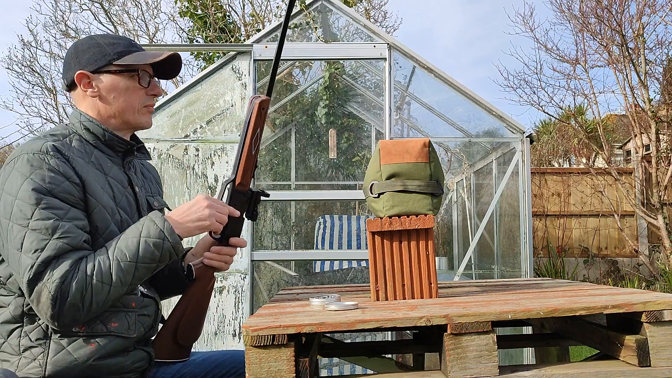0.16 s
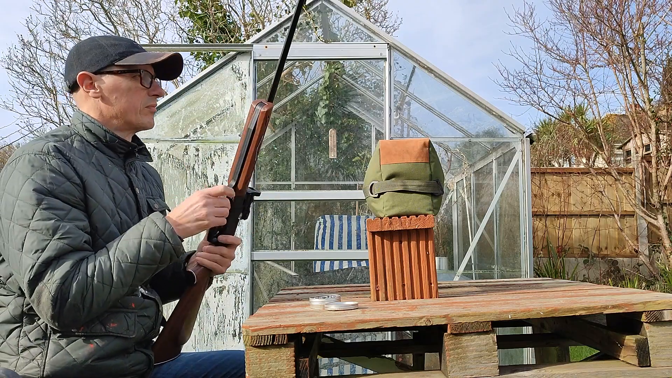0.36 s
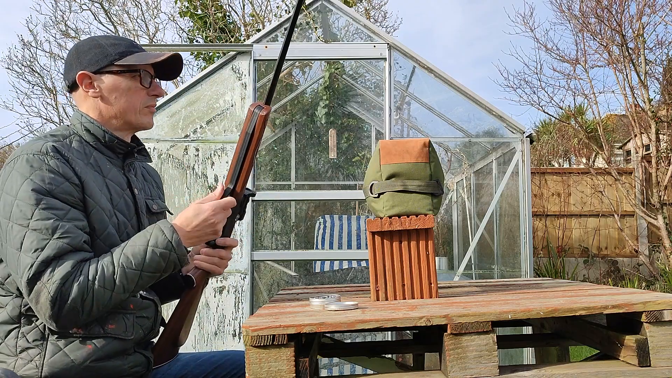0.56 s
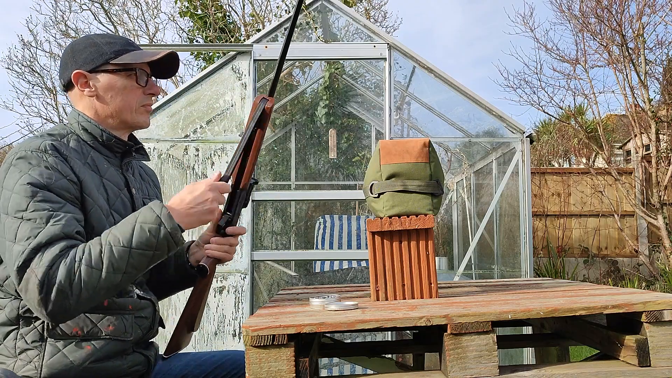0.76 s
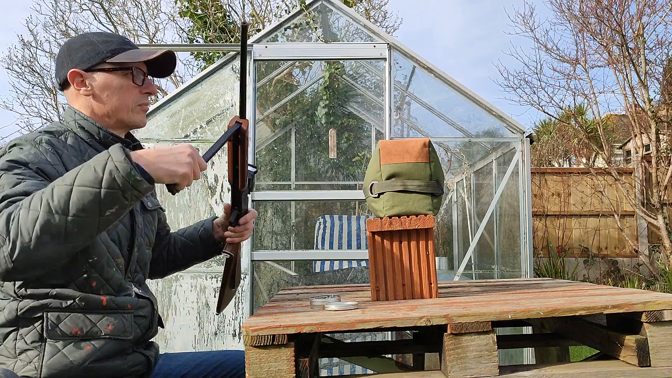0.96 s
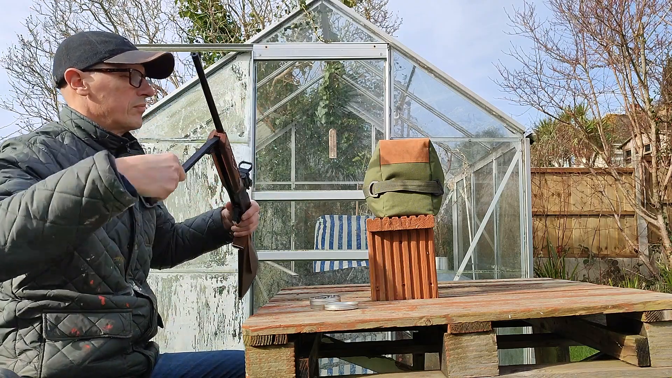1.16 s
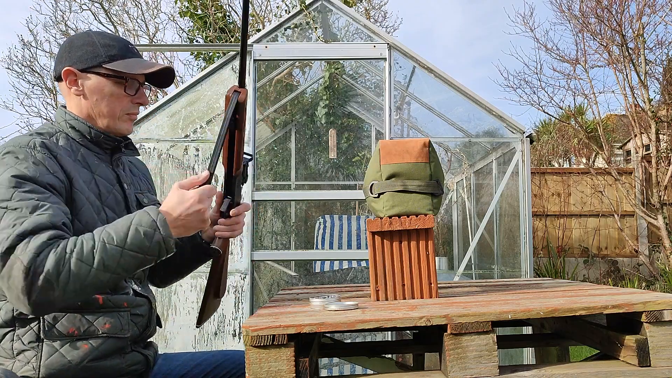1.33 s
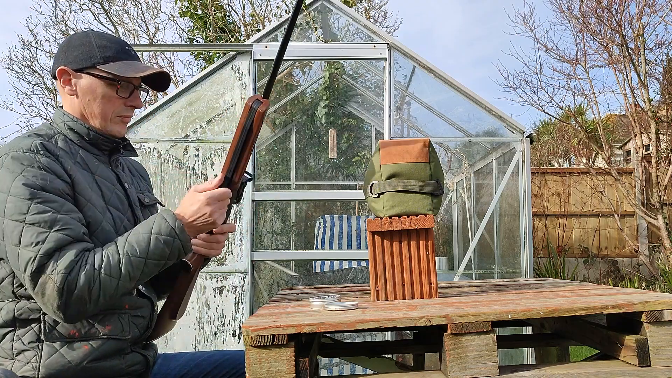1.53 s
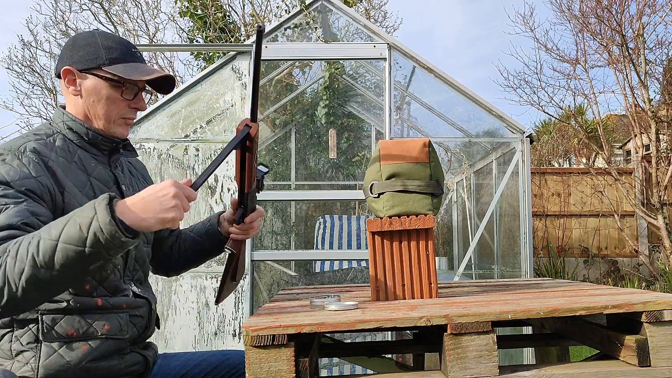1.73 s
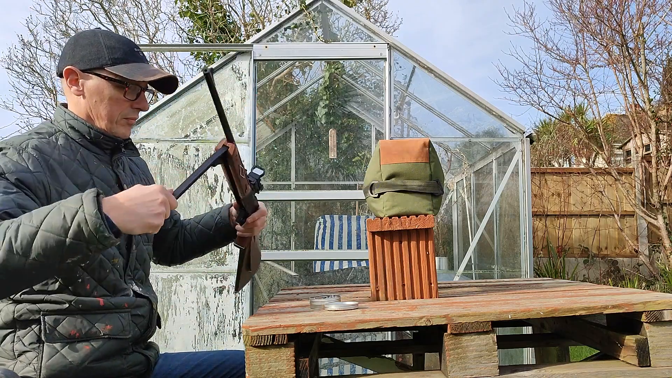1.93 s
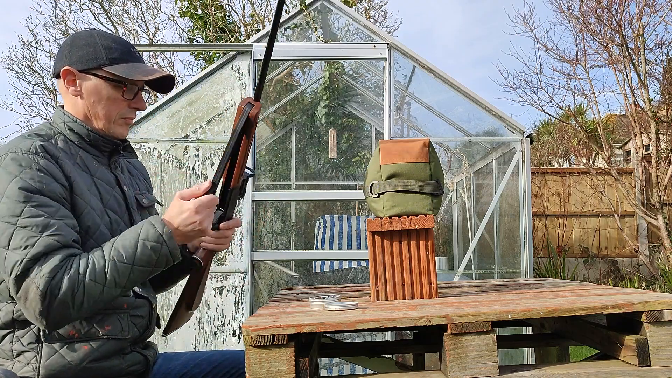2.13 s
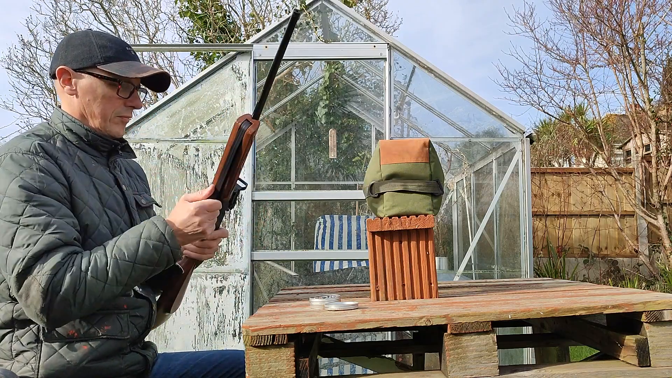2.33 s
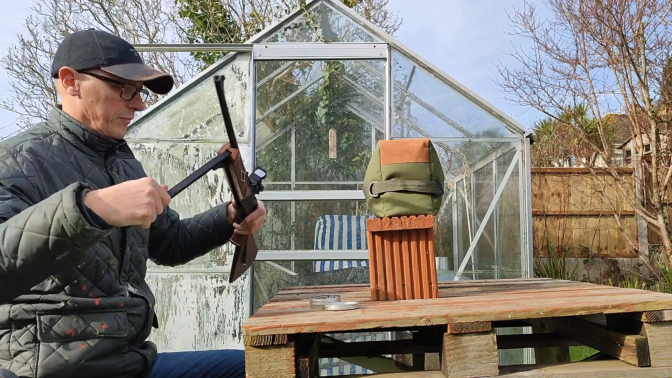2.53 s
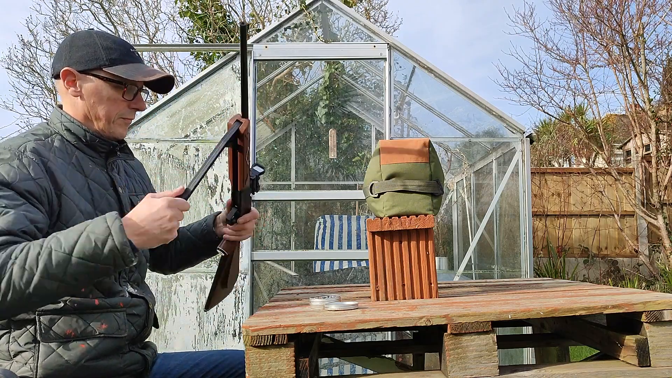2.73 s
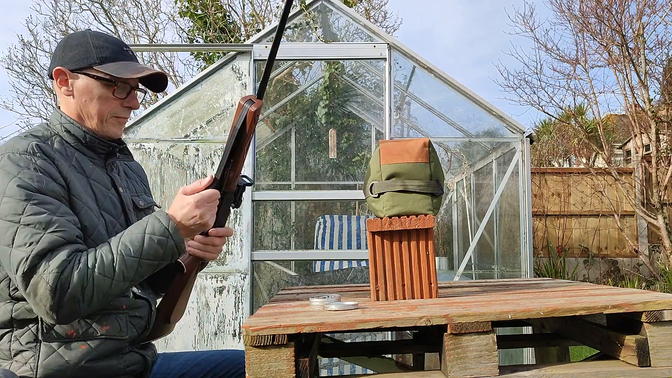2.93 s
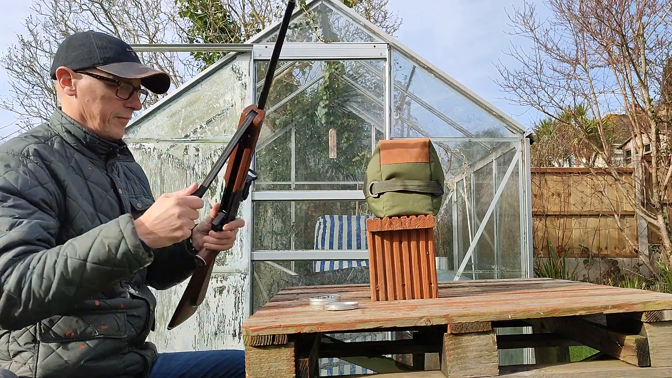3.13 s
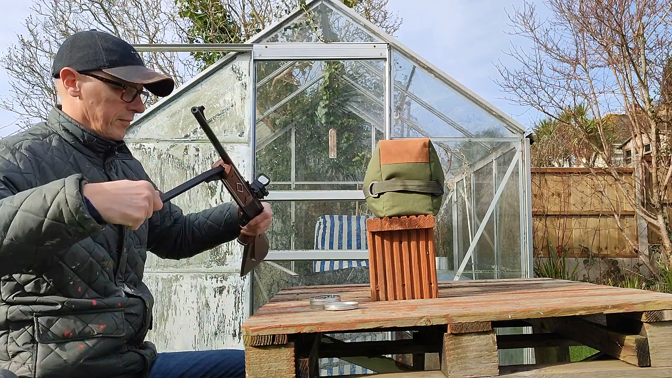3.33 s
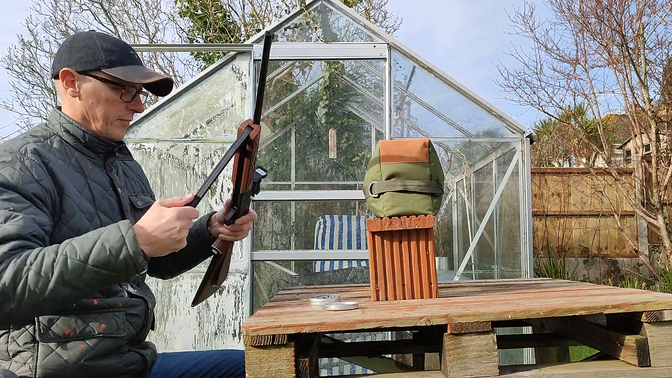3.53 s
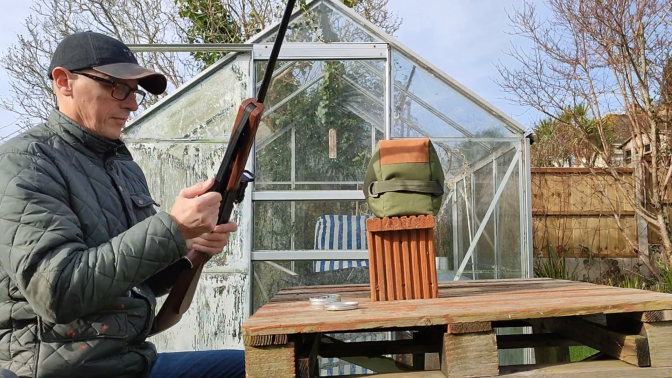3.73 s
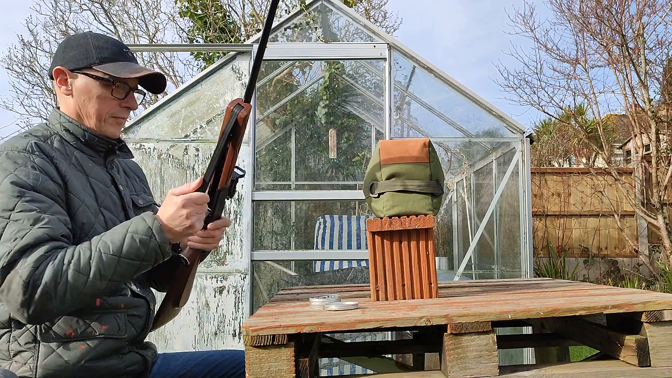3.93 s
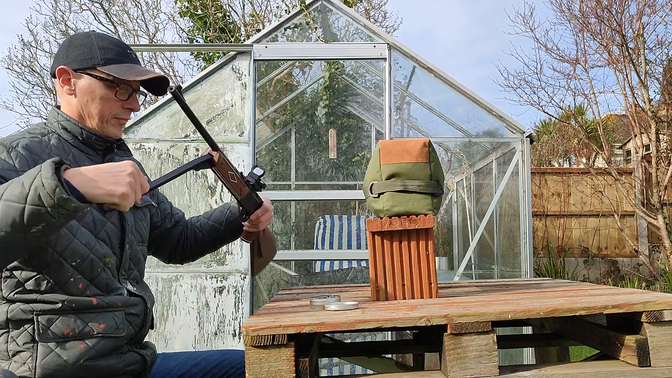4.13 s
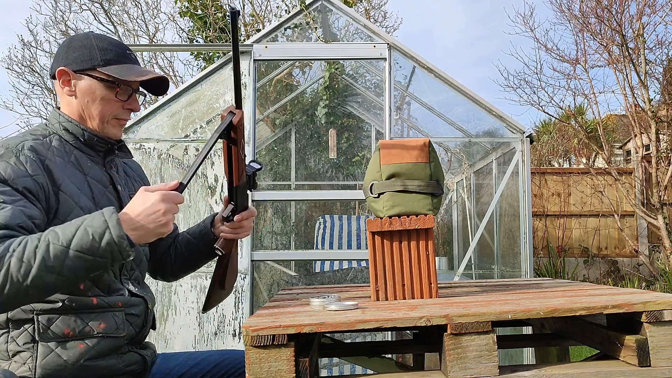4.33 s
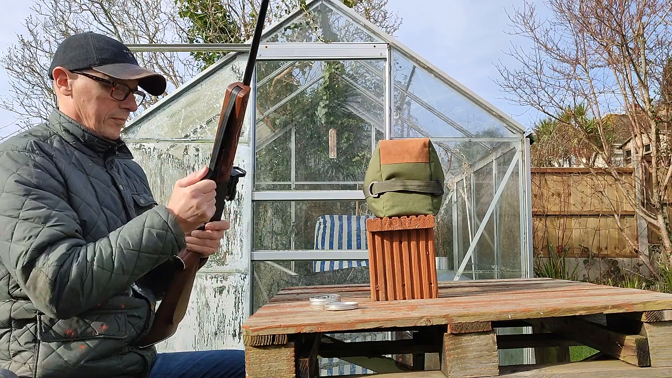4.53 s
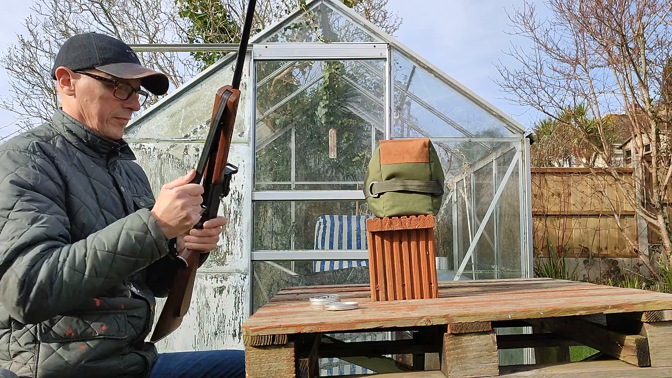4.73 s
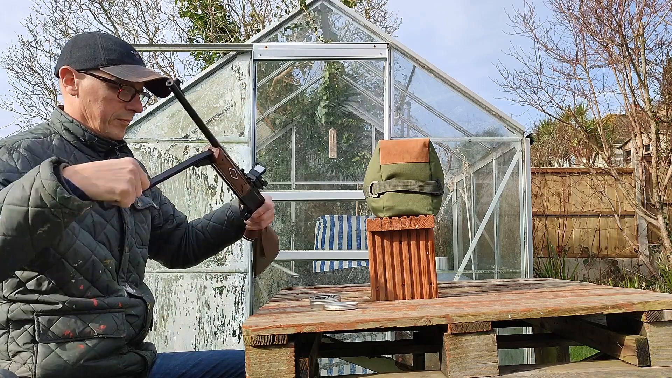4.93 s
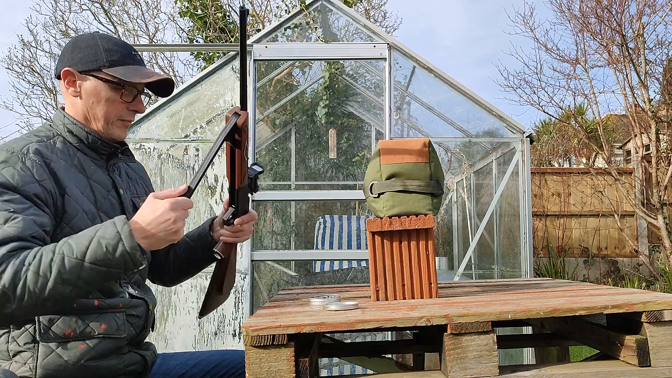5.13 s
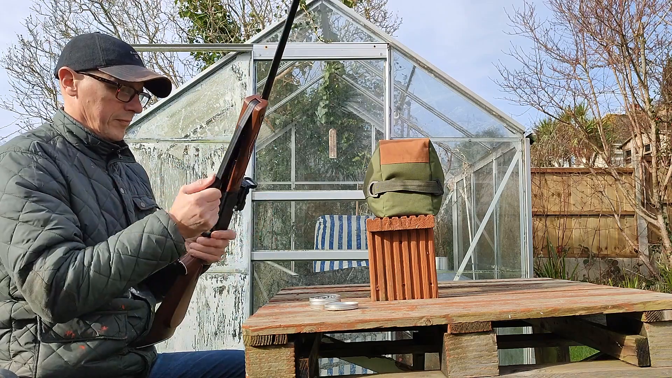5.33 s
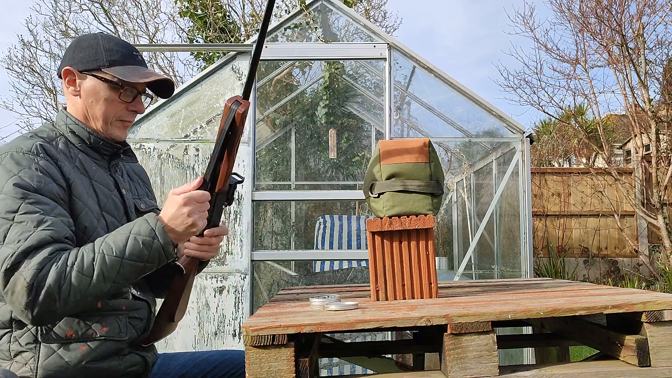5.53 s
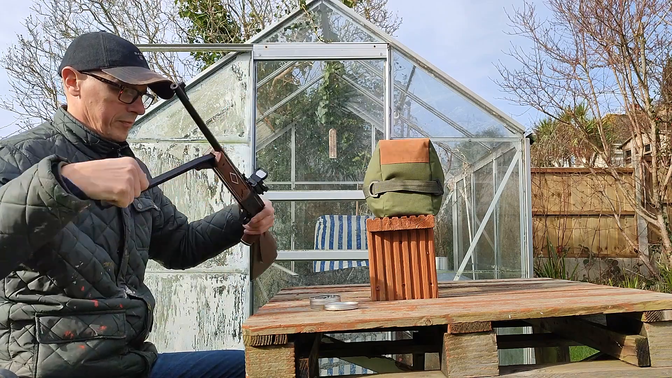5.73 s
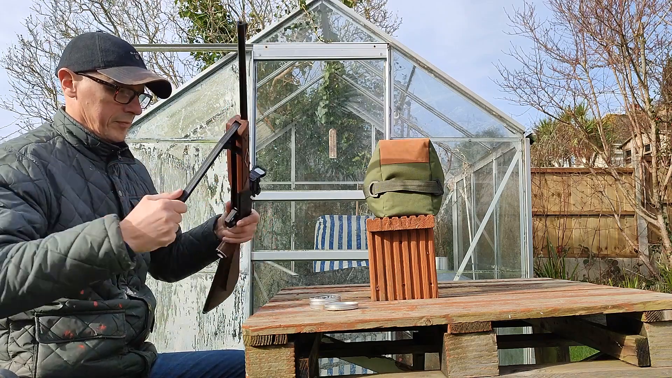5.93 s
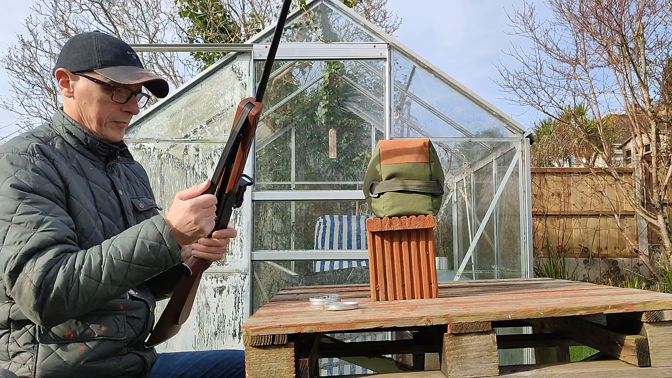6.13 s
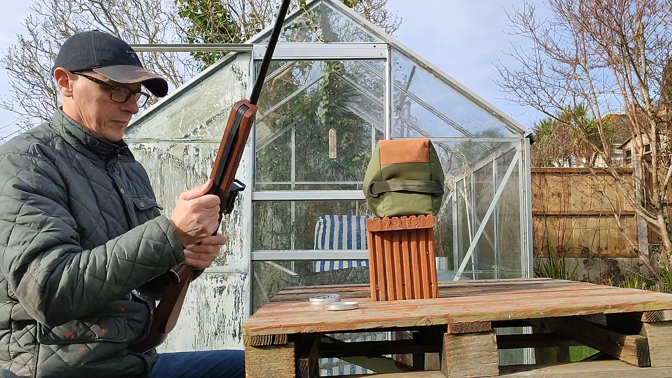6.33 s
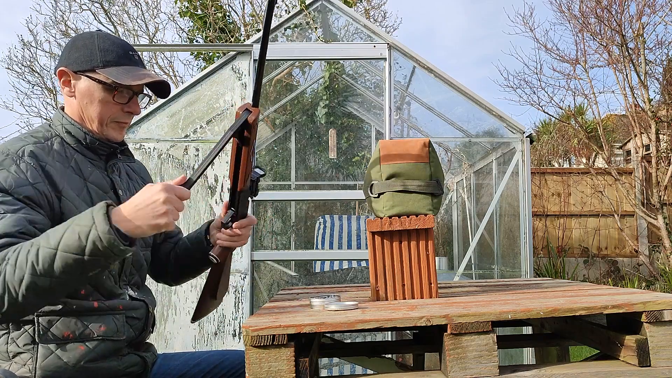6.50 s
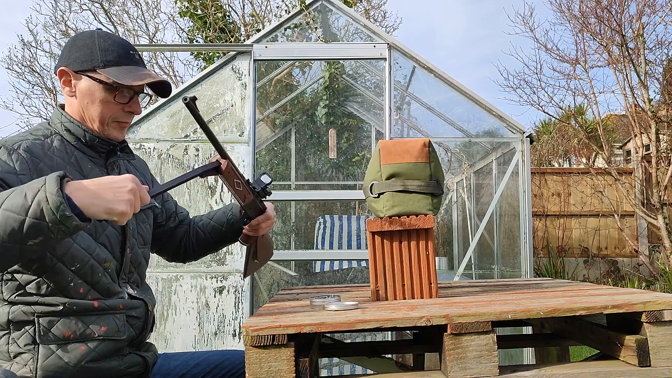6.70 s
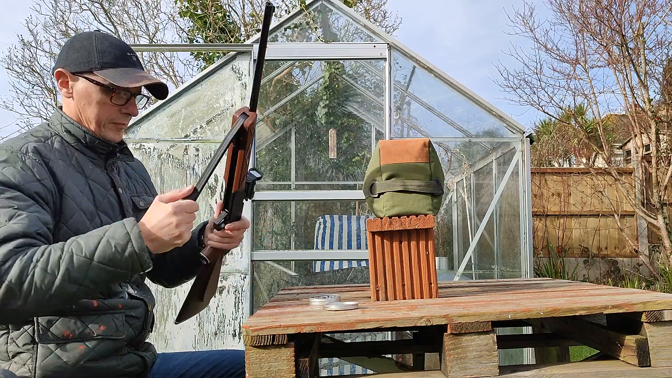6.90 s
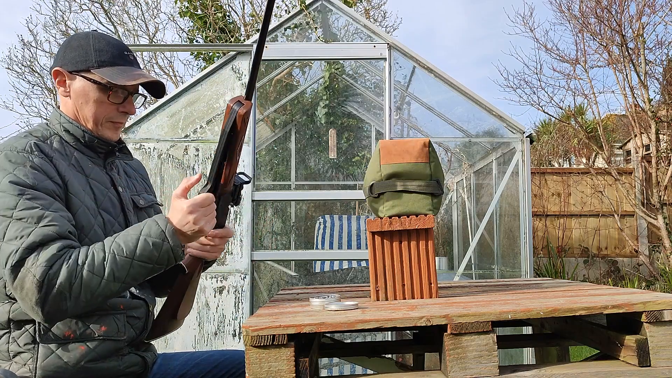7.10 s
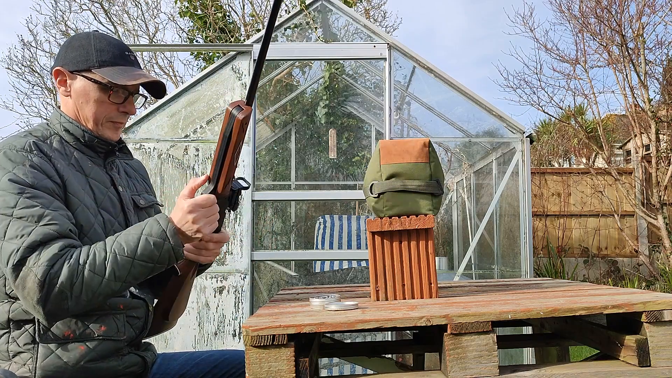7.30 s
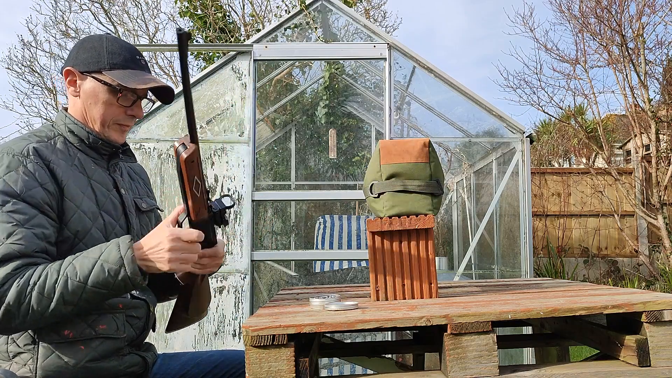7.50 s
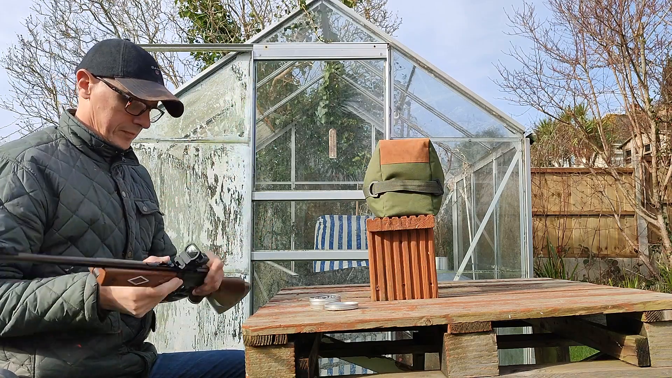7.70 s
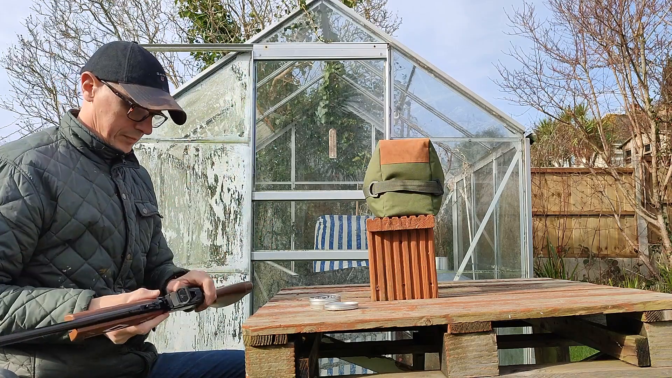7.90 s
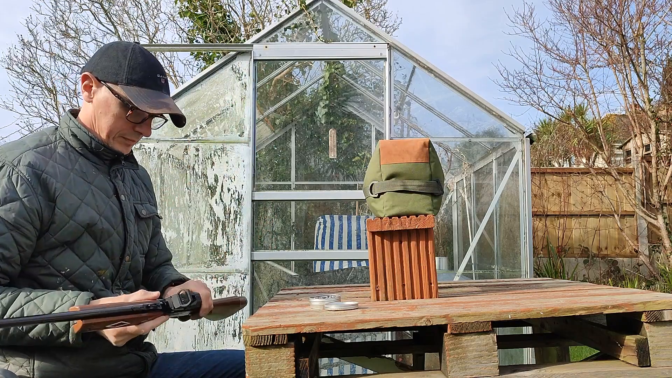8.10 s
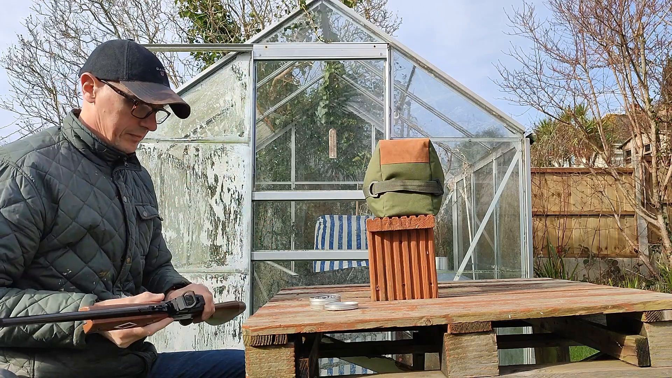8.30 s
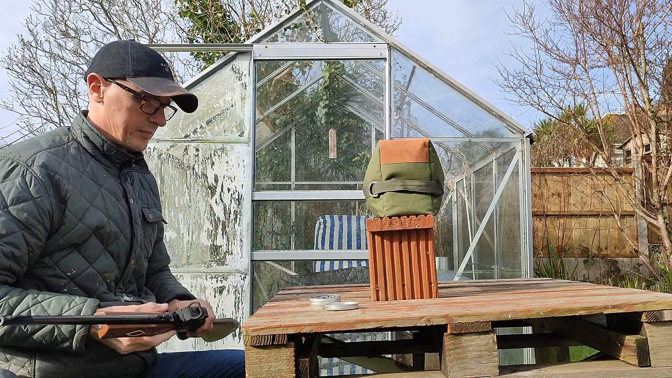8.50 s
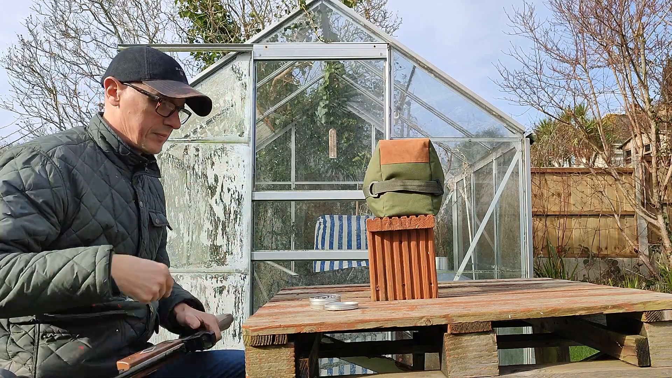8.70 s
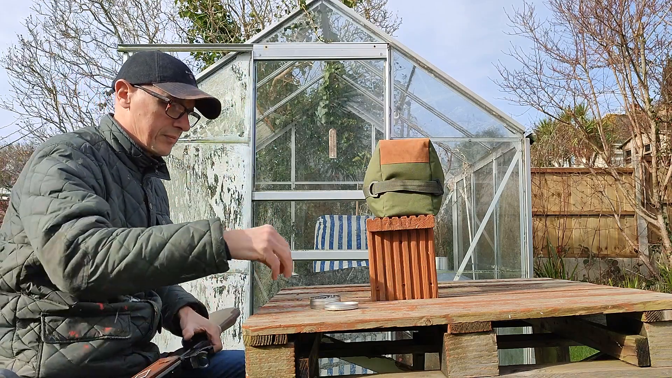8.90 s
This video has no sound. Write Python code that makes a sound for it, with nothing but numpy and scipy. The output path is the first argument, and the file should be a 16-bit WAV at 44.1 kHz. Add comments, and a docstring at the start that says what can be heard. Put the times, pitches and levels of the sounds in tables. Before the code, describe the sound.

An air rifle's pump arm is worked over and over with sharp clacks and lighter clicks, outdoors over faint distant traffic.

```python
"""In a garden, a few metres from a phone, someone works the pump arm of an air rifle.
Each time the arm, links and stops touch, they chatter briefly and make the rifle ring.
The piston seal rubs in its tube and a jacket rustles. A table, a glasshouse and a fence
throw echoes. Behind it all, distant traffic rumbles and a faint hum fades away."""
import sys
import numpy as np
from scipy import signal
from scipy.fft import rfft, irfft, next_fast_len
from scipy.io import wavfile
from scipy.ndimage import uniform_filter1d

SR = 44100
rng = np.random.default_rng(int(sys.argv[2]) if len(sys.argv) > 2 else 0)


def unload_audio(sound):
    """Save the sound as a 16-bit wav file, at the path given as the first command line argument."""
    columns = np.transpose(np.atleast_2d(sound))
    # keep every value between -1 and 1, then stretch to whole-number steps
    steps = np.round(np.clip(columns, -1, 1) * 32767)
    wavfile.write(sys.argv[1], SR, steps.astype(np.int16))


N = 394694
FREQ = np.arange(next_fast_len(N + SR) // 2 + 1) * SR / next_fast_len(N + SR)
FFT_SIZE = 2 * len(FREQ) - 2

# Six kinds of contact. Each row: time in seconds, level in dB, brightness in dB, extra wood sound in dB,
# chatter fade in ms. Levels in the tables are relative; a fade is the time to drop by 60 dB.
SLAMS = [(0.0, -32.5, -0.5, -22, 130), (0.017, -29.5, -4.5, -20, 53), (1.465, -18, -3, 1.5, 12.5),
         (1.472, -16.5, 0, 0, 34), (2.248, -24, 1, 8.5, 33), (2.259, -16, 1, 0, 24.5),
         (2.989, -23, 1, -2, 48), (3.003, -21.5, -1.5, 2, 26), (3.803, -16.5, -3.5, 4.5, 14),
         (3.813, -13.5, 1, -8, 24.4), (4.586, -11, 0, 0, 29), (5.406, -24, -5, -0.5, 21),
         (5.412, -11.5, 3, -4.5, 30), (6.276, -18.5, -2, 3, 37.4), (7.164, -27.5, -4, 1, 61),
         (7.166, -27, 8, 8, 25)]  # the arm slams shut on the tube, often in two blows
RELEASES = [(0.725, -31, 0, -12, 28), (0.736, -34, -3, -3, 33), (1.611, -31.5, 1.5, 2, 45),
            (1.621, -34, -2, 7, 38), (2.368, -30.5, 0.5, 1, 48), (3.16, -34.5, -1.5, -5, 36),
            (3.929, -31.5, 1, -3, 39.3), (4.727, -32, 0.5, -5, 43), (5.541, -30.5, -0.5, -2, 37.8),
            (6.421, -33.5, -2, -3, 48)]  # the arm leaves its catch with a hollow tock
LINKS = [(1.675, -37.5, -4, 6, 51), (4.006, -41.5, 9, -8, 30), (4.011, -30.5, -2, -8, 24),
         (4.806, -46, 10, -8, 52), (4.813, -36, -4.5, 0, 51), (5.62, -37.5, 2, 3, 33),
         (5.633, -42.5, -4, 0, 44), (6.508, -38.5, 5, -8, 21.75), (6.513, -40.5, -5.5, 4, 36)]  # the links take up their slack
SCRAPES = [(0.77, -36.5, -1.5, -1, 40), (0.784, -36, -2.5, 3, 40.4), (1.066, -38.5, 1, -3, 40.2),
           (1.681, -41, -5.5, 6, 40), (1.847, -38, 0.5, -3, 40), (2.398, -41, -6.5, -8, 40),
           (2.438, -34.5, -0.5, 1, 40), (2.597, -39, 0.5, -6, 40.2), (2.642, -47.5, -3, -4, 40),
           (3.311, -37, 1.5, 2, 40), (4.159, -36, -0.5, 5.5, 40), (4.96, -41, 1, 7, 41.3),
           (5.763, -39, 1, 1, 40.1), (6.658, -39, 0.5, 1, 40.3)]  # parts scrape into their stops
TICKS = [(1.229, -50.5, 1, 0, 23), (1.874, -61.5, 9, -4, 38), (1.903, -53.5, -7, 6, 30),
         (1.958, -51.5, 3.5, -4, 30), (2.126, -46, 0, -2, 40), (3.346, -57, 7, -2, 21.6),
         (3.361, -58, 5, 2, 35), (4.218, -51, -7.5, -2, 42), (4.994, -56.5, 2.5, 3, 49),
         (5.016, -48, -3.5, 0, 34), (5.822, -48, -7.5, -1, 42), (7.749, -42.5, -4.5, 8, 28),
         (8.346, -57, -5, -4, 35), (8.581, -55, -8, 6, 33)]  # loose pins tick
TAPS = [(4.787, -54, -1.5, -10, 30), (5.601, -57, 0, -8, 22), (7.394, -55.5, -4, -4.5, 43.8),
        (7.618, -49, 4.5, -2, 44.2), (7.878, -63.5, -2.5, 11, 52.3)]  # dull taps, most as the rifle is laid across the knees
# How each kind sounds. Each lists: levels in dB of stock, tube, arm, steel, edges and hollow note,
# then the note's pitch in Hz, its fade in seconds, chatter rise in ms, strike level in dB.
SLAM_TONE = (-25, -15, -16, -13, -27, -20, 1502, .035, .5, -2)
RELEASE_TONE = (-33, -13, -23, -18, -25, -10, 1310, .025, .5, -3)
LINK_TONE = (-26, -13, -14, -14, -23, -20, 1459, .035, 0.7, -6.5)
SCRAPE_TONE = (-24, -13, -17, -15.5, -21, -20.5, 1500, .035, 3, -28)
TICK_TONE = (-21, -18, -15, -12, -20, -16, 1350, .035, 0.6, 2)
TAP_TONE = (-10.5, -9.5, -15, -22, -31, 1, 890, .07, 1.3, 0)


def rifle(lowest_hz=282.6):
    """All the contacts, heard from the front and the side. The rifle is too small to give off deep bass."""
    knocks = (contacts(SLAMS, SLAM_TONE) + contacts(RELEASES, RELEASE_TONE) + contacts(LINKS, LINK_TONE)
              + contacts(SCRAPES, SCRAPE_TONE) + contacts(TICKS, TICK_TONE) + contacts(TAPS, TAP_TONE))
    return signal.sosfilt(signal.butter(4, lowest_hz, "high", fs=SR, output="sos"), knocks)


# The notes each part rings with. Each row: pitch in Hz, level in dB, fade in seconds.
STOCK_NOTES = [(357, -5.5, .03), (468, -2, 0.023), (647, -2.5, .02), (821, -5.5, 0.036)]
TUBE_NOTES = [(985, -8.5, .012), (1262, -8, 0.012), (1432, 1.5, 0.014), (1736, -3, 0.017),
              (2110, -5, 0.014)]
ARM_NOTES = [(2520, -1.4, .008), (2883, -0.49, 0.0089), (3420, 0, 0.0069), (3890, -1.5, 0.009),
             (4490, -2.3, 0.005)]
STEEL_NOTES = [(5200, 2, 0.00191), (6590, -2.5, 0.0039), (7476, -1, .003), (8800, -4, 0.00078)]
EDGE_NOTES = [(10400, -0.4, 0.00074), (12640, -0.66, 0.0012), (14300, -0.91, 0.00088)]
# How strongly stock, tube, arm, steel, edges and hollow note give off sound, in dB.
PART_DB = [6, 3.5, 8.22, 5.44, 6.63, 1.5]
BRIGHTNESS_SHARE = np.array([0, -1, 0, 1, 1.5, -1])  # dB each part gains per dB of brightness


def contacts(events, tone, grit_db=3.0):
    """Surfaces grind, strike, then chatter to rest, ringing each part. Gives front and side sound."""
    *tone_db, note_hz, note_fade, rise_ms, strike_db = tone
    hollow_note = [(note_hz, 0, note_fade)]
    parts = STOCK_NOTES, TUBE_NOTES, ARM_NOTES, STEEL_NOTES, EDGE_NOTES, hollow_note
    out = np.zeros((2, N + SR))
    lead = SR // 10  # room for grinding before the first strike
    ms = np.arange(SR // 14) / SR * 1000 - 5 * rise_ms
    strike = undb(strike_db) * np.exp(-np.abs(ms) / .35)
    for time, level_db, bright_db, wood_db, fade_ms in events:
        chatter = np.where(ms < 0, np.exp(ms / rise_ms), undb(-60 * ms / fade_ms))
        force = (chatter + strike) * undb(grit_db * rng.standard_normal(len(ms)))
        gains = undb(level_db + np.add(tone_db, PART_DB) + bright_db * BRIGHTNESS_SHARE)
        gains[0] *= undb(wood_db)
        start = lead + int((time + ms[0] / 1000) * SR)
        for direction in out:
            hit = sum(gain * ring(notes, force) for gain, notes in zip(gains, parts))
            direction[start:start + len(hit)] += hit
    return out[:, lead:lead + N]


def ring(notes, force):
    """Each note of a part is shaken by its own tiny slips and takes a share of the blow's energy."""
    t = np.arange(SR // 16) / SR
    hz, db, fade = np.transpose(notes)[:, :, None]
    slips = force * rng.standard_normal((len(notes), len(force)))
    fading_tones = undb(-60 * t / fade) * np.sin(2 * np.pi * hz * t)
    swing = signal.fftconvolve(slips, fading_tones, axes=1)
    swing *= np.sqrt(np.sum(force ** 2) / np.sum(swing ** 2, axis=1, keepdims=True))
    strength = undb(db) * np.sqrt(fade)
    share = strength / np.linalg.norm(strength)
    return np.sum(share * swing, axis=0)


def uneven_spread(side):
    """Sound waves shorter than the rifle spread unevenly, so left and right differ in the treble."""
    treble = shape(side, 1j * FREQ / (1j * FREQ + 2000))
    return undb(-3.5) * treble * np.array([[1], [.25]])


# Strokes of the seal, one each way. Each row: start in seconds, level in dB.
SEAL_STROKES = [(0.837, -67), (1.25, -60.5), (1.682, -57), (1.996, -61), (2.437, -57.5), (2.71, -62.5),
                (3.17, -59.5), (3.497, -65), (4.017, -60.5), (4.32, -61.5), (4.81, -60), (5.085, -65),
                (5.635, -61), (5.921, -61.5), (6.502, -61), (6.833, -63.5)]
# The colour of its rubbing. Each row: pitch in Hz, rough width in Hz, level in dB.
SEAL_BANDS = [(980, 150, -7), (1430, 200, 0), (1750, 260, -3), (2300, 700, -10)]


def seal(t, stroke_s=0.11):
    """The piston seal swishes as it rubs along the tube."""
    strokes = [(start, stroke_s, db) for start, db in SEAL_STROKES]
    return swells(t, strokes) * friction(SEAL_BANDS, rate_hz=60, flicker_db=1.5)


# Sleeve brushes and thin cuff flicks. Each row: start in seconds, length in seconds, level in dB.
SLEEVE_MOVES = [(-.15, 0.32, -60.5), (0.09, 0.4, -77.5), (0.802, 0.66, -78.5), (1.35, 0.86, -79.5),
                (2.1, 0.74, -77), (2.795, 0.56, -73.5), (3.85, 0.36, -79), (4.443, .65, -73),
                (5.149, 0.77, -74), (6.195, 0.59, -74.5), (7.314, 0.67, -71.5)]
CUFF_FLICKS = [(8.52, 0.073, -76.5), (8.623, 0.07, -68)]
# The colour of each. Each row: pitch in Hz, rough width in Hz, level in dB.
SLEEVE_BANDS = [(2500, 1500, -2), (4500, 2500, 0), (7000, 2500, -2)]
CUFF_BANDS = [(5200, 900, 0), (7500, 3000, -3), (11500, 4000, -3)]


def jacket(t, resting_db=-82.5):
    """Sleeves brush quilted cloth over a wide area, so each microphone hears its own rustle."""
    rustle = np.array([friction(SLEEVE_BANDS, rate_hz=100, flicker_db=2.5) for _ in range(2)])
    swish = np.array([friction(CUFF_BANDS, rate_hz=180, flicker_db=1.8) for _ in range(2)])
    return (undb(resting_db) + swells(t, SLEEVE_MOVES)) * rustle + swells(t, CUFF_FLICKS) * swish


def friction(bands, rate_hz, flicker_db):
    """Rubbing with uneven pressure makes a flickering hiss; each band gets its own noise."""
    pressure = undb(flicker_db * wander(rate_hz))
    return unit(sum(undb(db) * shape(pressure * rng.standard_normal(N), band(hz, 1.5 * width) ** 2)
                    for hz, width, db in bands))


# Single echoes. Each row: delay in ms, left level in dB, right level in dB, extra left delay in ms.
ECHOES = [(7.977, -16, -21.5, -0.015), (28.75, -23, -17.5, -0.073), (35.27, -21, -26, -0.3),
          (47.5, -40, -34.5, 0.18)]
# Clouds of weak echoes. Each row: pitch in Hz, fade in seconds, level in dB.
ECHO_TAILS = [(404, 0.12, -19.5), (1160, 0.32, -18.5), (2900, 0.29, -18), (7500, .22, -16.5),
              (11940, 0.048, -10.5)]


def garden(front, side, onset_ms=3.1, right_lag_ms=0.11, dull_above_hz=6120):
    """The front sound arrives directly and as echoes; the side sound only as a scattered tail."""
    t = np.arange(SR // 2) / SR
    onset = 1 - np.exp(-(t * 1000 / onset_ms) ** 2)
    channels = []
    for left in (1, 0):
        direct = undb(-3.75) if left else undb(-1.25) * delay(right_lag_ms)
        echoes = sum(undb(db[1 - left]) * delay(ms + right_lag_ms + left * lag)
                     for ms, *db, lag in ECHOES)
        echoes /= 1 + 1j * FREQ / dull_above_hz  # wood and leaves swallow the treble
        front_tail, side_tail = (
            sum(undb(db - 1) * band(hz, hz) * scatter(onset * undb(-60 * t / fade))
                for hz, fade, db in ECHO_TAILS) for _ in range(2))
        channels.append(shape(front, direct + echoes + front_tail) + shape(side, side_tail))
    return np.array(channels)


def scatter(envelope):
    """A filter made of many weak, random echoes whose strength follows the envelope."""
    cloud = rng.standard_normal(len(envelope)) * envelope
    return rfft(cloud / np.linalg.norm(cloud), FFT_SIZE)


# The colour of the road noise. Each row: pitch in Hz, level in dB.
TRAFFIC_COLOUR = [(12, -23), (20, 5.5), (63, -2), (310, -22), (1440, -27.5), (5230, -47), (7520, -46.5),
                  (8890, -53), (14300, -44.5), (16000, -60)]
# How alike its left and right are. Each row: pitch in Hz, likeness from -1 (opposite) to 1 (same).
TRAFFIC_LIKENESS = [(30, .6), (70, .78), (130, .75), (290, .6), (640, -.25), (1410, -.3), (3100, 0),
                    (15000, 0)]
# Its deepest rumble. Each row: time in seconds, level in dB.
RUMBLE_LEVELS = [(0.0, -60), (0.05, -57), (1.74, -55), (5.53, -57), (5.56, -53), (6.98, -55), (7.25, -46.5),
                 (7.3, -57.5), (8.37, -50), (8.6, -52.5), (8.95, -52)]


def traffic(t, road_db=-53, rumble_below_hz=90):
    """Far road noise comes from all round; its deepest part swells and sinks."""
    colour, likeness = undb(curve(TRAFFIC_COLOUR)), curve(TRAFFIC_LIKENESS)
    common = shape(rng.standard_normal(N), colour * np.sqrt(1 + likeness))
    opposed = shape(rng.standard_normal(N), colour * np.sqrt(1 - likeness))
    road = undb(road_db) * unit(np.array([common + opposed, common - opposed]))
    road *= undb([[-.6], [.6]])  # a little louder on the right
    rumble = shape(road, 1 / (1 + (FREQ / rumble_below_hz) ** 8))
    rumble_db = np.interp(t, *np.transpose(RUMBLE_LEVELS))
    return road - rumble + unit(rumble) * undb(rumble_db)


def hum(t, hz=595, level_db=-80, gone_at_s=3.5):
    """A faint, wavering tone far away holds, then dies out."""
    tone = unit(shape(rng.standard_normal(N), band(hz, width_hz=25) ** 2))
    return undb(level_db) * np.clip(2 * (1 - t / gone_at_s), 0, 1) * tone


def swells(t, moves):
    """Loudness rises and falls in one arch with the speed of each movement."""
    return sum(undb(db) * np.sin(np.pi * np.clip((t - start) / length, 0, 1))
               for start, length, db in moves)


def wander(rate_hz):
    """A smooth random drift, roughly 1 either side of zero."""
    hold = int(SR / rate_hz)
    steps = np.repeat(rng.standard_normal(N // hold + 1), hold)
    return 1.3 * uniform_filter1d(uniform_filter1d(steps, hold), hold)[:N]


def undb(db):
    """Turn dB into a multiplier."""
    return 10 ** (np.asarray(db) / 20)


def unit(x):
    """Scale to an average (rms) level of 1."""
    return x / np.sqrt(np.mean(x ** 2))


def shape(x, gain):
    """Apply a filter: one gain for each frequency in FREQ."""
    return irfft(rfft(x, FFT_SIZE) * gain, FFT_SIZE)[..., :N]


def delay(ms):
    """A filter that makes a sound arrive later."""
    return np.exp(-2j * np.pi * FREQ * ms / 1000)


def band(hz, width_hz):
    """A filter that favours sound near one pitch."""
    f = FREQ + 1e-3
    return 1 / (1 + 1j * (f / hz - hz / f) * hz / width_hz)


def curve(table):
    """Join a table's (pitch, value) points into a curve over FREQ."""
    hz, value = np.transpose(table)
    return np.interp(np.log(FREQ + 1), np.log(hz), value)


def scene():
    """Rifle, seal and jacket in the garden, over the hum and traffic."""
    t = np.arange(N) / SR
    front, side = rifle()
    near = garden(front + seal(t), side) + uneven_spread(side) + jacket(t)
    return near + hum(t) + traffic(t)


def record(dry, top_hz=16000):
    """The phone cuts off the highest treble."""
    return signal.sosfilt(signal.ellip(8, .2, 70, top_hz, fs=SR, output="sos"), dry)


dry = scene()
out = record(dry)
unload_audio(out)
```